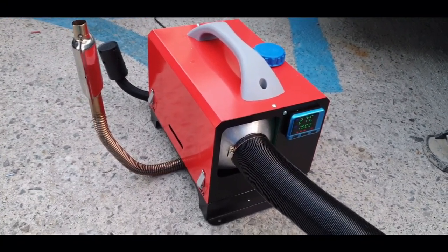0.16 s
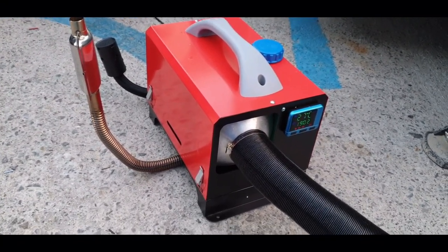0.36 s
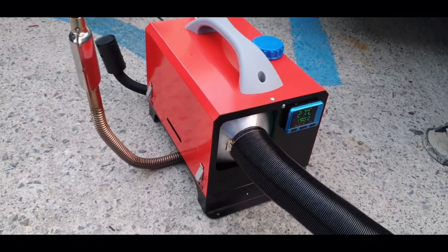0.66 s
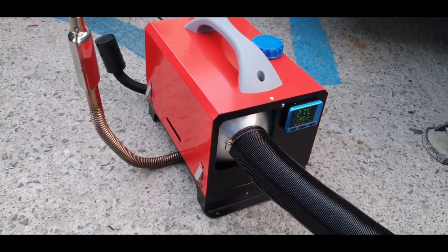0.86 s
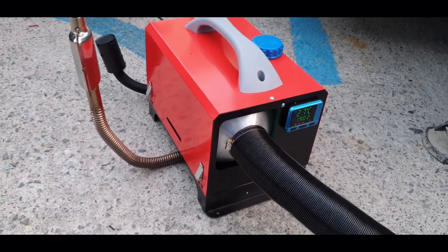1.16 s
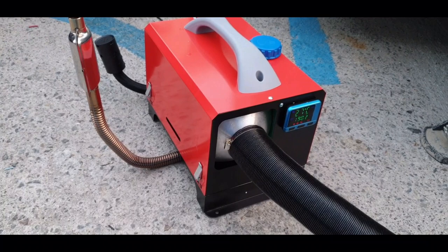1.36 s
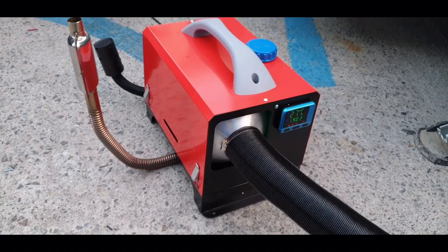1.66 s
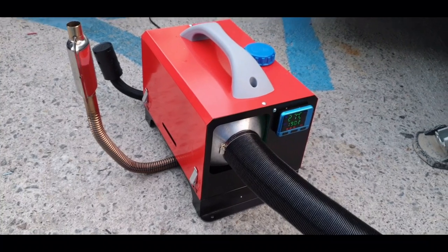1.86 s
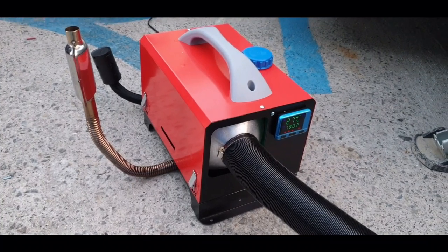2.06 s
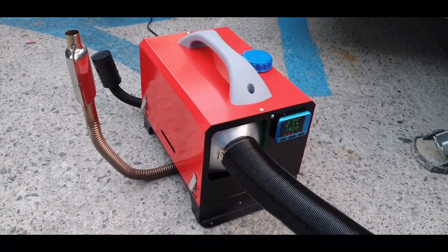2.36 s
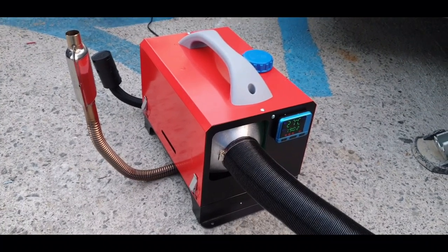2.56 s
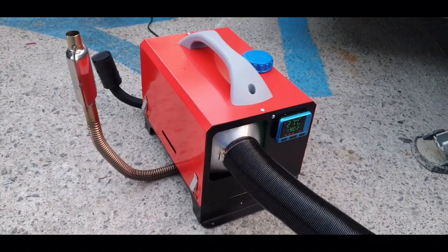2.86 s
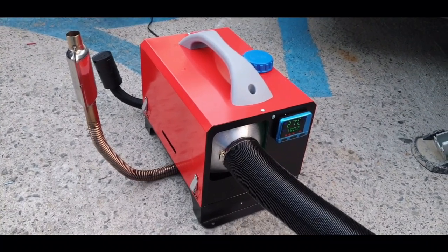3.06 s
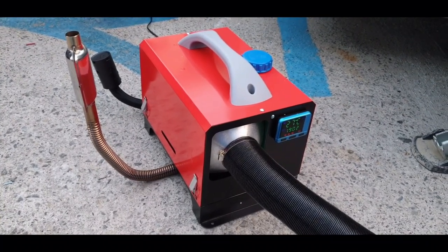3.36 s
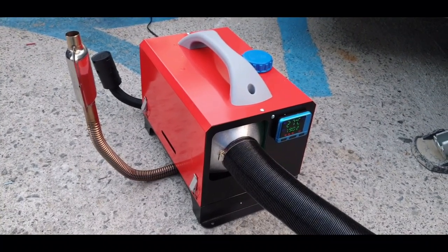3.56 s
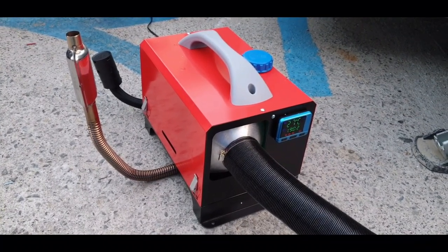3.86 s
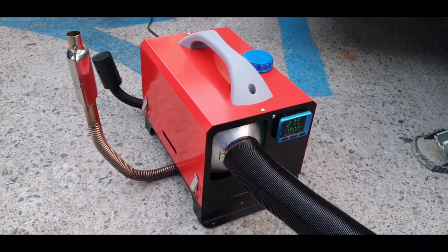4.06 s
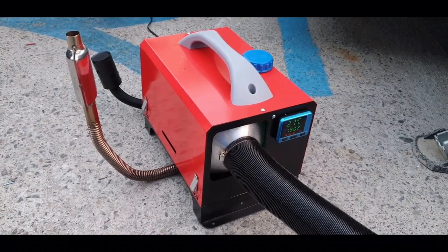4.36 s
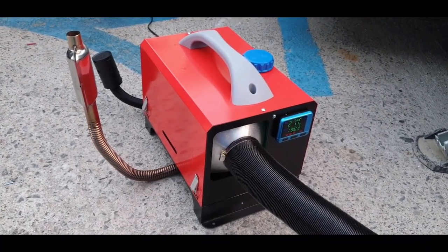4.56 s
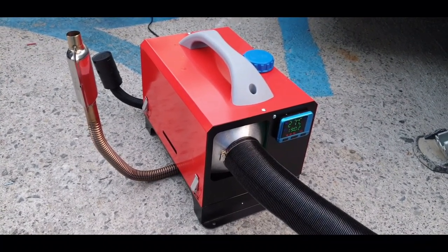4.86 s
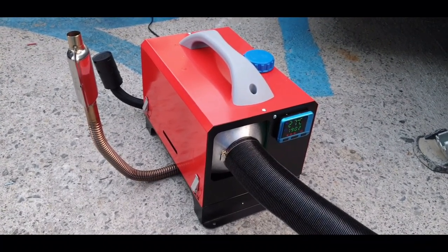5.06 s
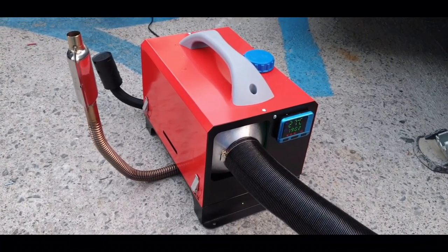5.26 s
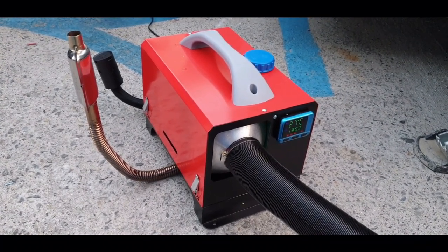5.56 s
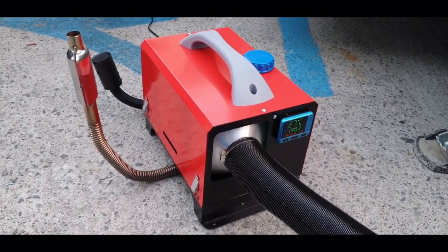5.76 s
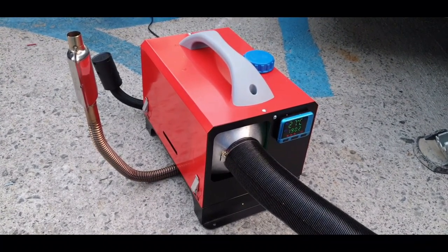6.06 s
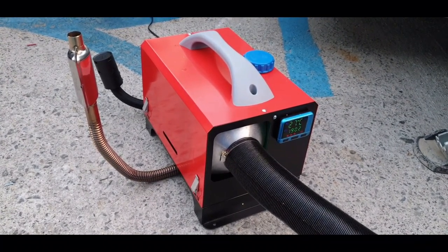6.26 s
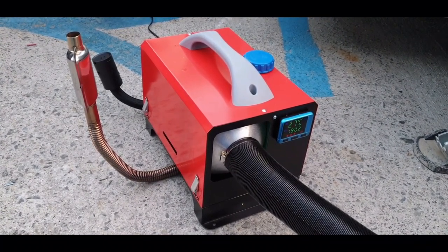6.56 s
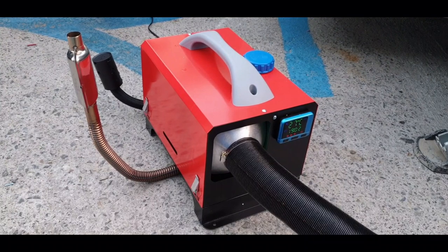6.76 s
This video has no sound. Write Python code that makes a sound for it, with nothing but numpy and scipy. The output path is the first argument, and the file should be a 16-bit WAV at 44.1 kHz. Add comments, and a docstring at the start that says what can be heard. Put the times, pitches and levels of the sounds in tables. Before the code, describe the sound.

A small fuel-burning heater drones low and unsteady outdoors with a faint blower whine, while cloth rustles and wind thumps the microphone.

```python
"""Diesel heater outdoors

A small diesel heater runs on concrete, close to a hand-held stereo microphone with left and right ports.
The flame drones as a wandering sine, flow noise rings the exhaust pipe, the blower whines in sines and
its brushes tick on every bar, loudest once a turn. Cloth rustles and snaps: shaped noise, strokes to the
right. Wind roars and buffets one port at a time, over a surging hiss and a bed of air and far traffic."""
import sys
import numpy as np
from scipy import signal
from scipy.io import wavfile
from scipy.ndimage import uniform_filter1d

SR = 44100
rng = np.random.default_rng(int(sys.argv[2]) if len(sys.argv) > 2 else 0)


def dump_mix(stems):
    """Bounce the given channels to the path in sys.argv[1] as a 16-bit WAV at rate SR."""
    frames = np.atleast_2d(stems).T  # one column per channel
    limited = np.clip(frames, -1, 1)  # hard clip at full scale
    pcm = np.round(limited * 32767).astype(np.int16)
    wavfile.write(sys.argv[1], SR, pcm)


N = 305157  # samples


def gain_of(db):
    """Decibels to gain."""
    return 10 ** (np.asarray(db) / 20)


def evened(x):
    """Scales to rms 1."""
    return x / np.sqrt(np.mean(x ** 2) + 1e-20)


def read(points, hz):
    """Interpolates a spectrum on a log-frequency axis."""
    f, value = np.transpose(points)
    return np.interp(np.log(hz + 1), np.log(f + 1), value)


def curves(rows):
    """Interpolates each column over time, one array of N samples per column."""
    s, *columns = np.transpose(rows)
    return [np.interp(np.arange(N) / SR, s, c) for c in columns]


def ports(left_minus_right_db):
    """Left and right gains for a level difference, total power kept."""
    left = gain_of(left_minus_right_db)
    return np.sqrt(2) * np.array([left, np.ones_like(left)]) / np.sqrt(1 + left ** 2)


def add(mix, s, sound):
    """Mixes a stereo sound in at s seconds."""
    part = mix[:, round(s * SR):][:, :sound.shape[1]]
    part += sound[:, :part.shape[1]]


def chance(size):
    """Smooth random wander of rms 1, changing over about size samples."""
    once = uniform_filter1d(rng.standard_normal(N), size=size)
    return evened(uniform_filter1d(once, size=size))


def swells(rows):
    """Power of swells that rise and fade evenly in dB; a negative fade time mirrors the swell in time."""
    t = np.arange(N) / SR
    rise_share = .65  # rise time / fade time
    power = 0
    for s, db, fade_s in rows:
        fade, rise = (t - s) / fade_s, (s - t) / (rise_share * fade_s)
        power = power + gain_of(2 * (db - 10 * np.maximum(fade, rise)))
    return power


def resonate(x, hz, width_hz):
    """Shifts the curve hz down to zero, smooths with two equal poles, shifts back; complex output."""
    turn = np.exp(2j * np.pi * np.cumsum(hz * np.ones(len(x))) / SR)
    r = np.exp(-np.pi * width_hz / SR)
    return turn * signal.lfilter([(1 - r) ** 2], [1, -2 * r, r * r], x / turn)


def noise(spectrum, balance, same, size, patchy_db, flicker_db):
    """Random short-time spectra with drifting patches and a flicker shared by all bands; rms 1."""
    frames, hz = 4 * N // size + 5, np.fft.rfftfreq(size, 1 / SR)
    a, b, c, d, patches = rng.standard_normal((frames, len(hz), 5)).T
    patches = uniform_filter1d(patches, size=8, axis=0)  # over bins
    patches = evened(uniform_filter1d(patches, size=12, axis=1))  # over frames
    flicker = rng.standard_normal(frames)
    same = np.clip(same(hz), 0, 1)[:, None]  # left-right likeness
    left, other = a + 1j * b, c + 1j * d
    lag = np.exp(-1j * 0.118)  # the shared part reaches the right port 0.118 rad late
    z = np.array([left, same * lag * left + np.sqrt(1 - same ** 2) * other])
    level_db = read(spectrum, hz)[:, None] + patchy_db * patches + flicker_db * flicker
    z *= ports(read(balance, hz))[:, :, None] * gain_of(level_db)
    return evened(signal.istft(z, nperseg=size, noverlap=3 * size // 4)[1][:, :N])


def drone():
    """The flame pulses unsteadily in a low, wandering note."""
    # mean course: (time [s], pitch [Hz], level [dB])
    flame_rows = [(0.0, 69.23, -43.5), (0.27, 78.45, -36.5), (0.71, 72.1, -35.5), (0.85, 74.45, -39),
                  (1.56, 73.5, -31), (1.69, 78.13, -42), (1.77, 72.2, -44), (1.97, 74.64, -30),
                  (2.21, 74.56, -26.5), (2.25, 74.38, -43), (2.33, 73.8, -31), (2.62, 77.92, -36.5),
                  (2.79, 74.4, -32), (3.04, 81.5, -36.5), (3.41, 78.5, -38.5), (3.93, 80.2, -30),
                  (4.35, 80.17, -32), (4.43, 79.35, -24), (4.55, 78.5, -40.5), (4.74, 78.77, -32),
                  (4.87, 76.08, -39), (5.36, 77.6, -32.5), (5.45, 81.74, -32.5), (5.69, 81.42, -32),
                  (5.78, 77.2, -28.5), (6.01, 77.9, -40), (6.03, 77.43, -34), (6.61, 75.7, -42.5),
                  (6.84, 77.6, -31), (6.92, 74.36, -33)]
    wander_hz, flutter_db = 2.9936, 2  # rms
    hz, db = curves(flame_rows)
    angle = 2 * np.pi * np.cumsum(hz + wander_hz * chance(size=1500)) / SR
    level = gain_of(db + flutter_db * chance(size=2000))
    return np.sqrt(2) * level * ports(-2.2)[:, None] * np.sin([angle + 0.54, angle])


def pipe():
    """Turbulent flow rings the pipe resonances, each swelling and sinking on its own."""
    # hot gas raises the resonances: (time [s], factor on pitch, flow level [dB])
    warmth_rows = [(0, 0.978, -52.5), (1.5, 0.987, -51), (3, 0.999, -51), (4.5, 1.005, -52),
                   (6, 1.018, -52), (6.92, 1.02, -54.5)]
    # resonances before warming:
    # (pitch [Hz], pole width [Hz], relative level [dB], left minus right [dB], left lead [rad])
    pipe_modes = [(54, 16.4, 12, -3, 0.07), (249.1, 43, -0.5, -2, 0.29), (283.7, 31.2, -1.5, -6.5, 0.15),
                  (452.5, 86.9, -3, 1, 0.77), (708.3, 34.4, -4.5, 2.5, 0.91), (748.3, 55, -11.5, 6, 0.753),
                  (925, 43, -18, -1, 3.06), (980, 146, -7, 3, 1.75), (1107.8, 28.3, -5, 4, 0.366),
                  (1131.5, 37, -3, -2, 0.52), (1184.1, 50, -7.5, 1, 1.62), (1025, 105, -10.5, -4, 3.06),
                  (1859.2, 160, -17, 6.5, 1.36)]
    swell_db = 2.0  # rms
    factor, flow_db = curves(warmth_rows)
    flow, out = rng.standard_normal(N), np.zeros((2, N))
    for hz, width_hz, mode_db, pan_db, lead_rad in pipe_modes:
        ring = resonate(flow, hz * factor, width_hz) * gain_of(swell_db * chance(size=1200))
        ring = ring / np.sqrt(np.mean(ring.real ** 2))
        both = np.array([(ring * np.exp(1j * lead_rad)).real, ring.real])
        out += gain_of(mode_db) * ports(pan_db)[:, None] * both
    return gain_of(flow_db) * out


def blower():
    """A blade tone with side tones one turn apart, and brush ticks on unevenly cut commutator bars."""
    # whine: (time [s], blade tone [Hz], level [dB])
    whine_rows = [(0, 672.7, -55), (1.6, 672.2, -55), (3.2, 674.9, -55), (4.25, 681.5, -56.5),
                  (5.45, 688.4, -60), (6.92, 700, -62)]
    # brush ticks: (time [s], level [dB])
    brush_rows = [(0, -65.5), (1.5, -69.5), (3, -68), (4.2, -66), (5, -61.5), (6.92, -79)]
    # motor housing rung by the brushes: (pitch [Hz], pole width [Hz], relative level [dB])
    housing_modes = [(9250, 250, -9), (9700, 200, -8), (11020, 160, -4), (11240, 150, -6), (11520, 300, 0),
                     (11820, 200, -4)]
    blades, brush_bars = 21, 10
    hz, tone_db = curves(whine_rows)
    ticks_db, = curves(brush_rows)
    turns = np.cumsum(hz) / SR / blades

    lead_rad = np.array([[.6], [0]])
    tone = 0
    for k, side_db in ((0, 0), (-1, -15), (1, -15)):
        tone = tone + gain_of(side_db) * np.sin(2 * np.pi * (blades + k) * turns + lead_rad)

    phase = turns + 0.49
    at = np.flatnonzero(np.diff(np.floor(phase * brush_bars)))
    bar = (phase[at + 1] * brush_bars).astype(int) % brush_bars
    # samples: a fixed offset per bar, plus jitter
    late = rng.integers(0, 60, brush_bars)[bar] + rng.integers(0, 2, len(at))
    tick_db = 11 * np.cos(2 * np.pi * phase[at]) + 2.5 * rng.standard_normal(len(at))  # peaks once a turn
    ticks = np.zeros(N + 100)
    ticks[at + late] = gain_of(tick_db)
    ring = evened(sum(gain_of(d) * evened(resonate(ticks[:N], f, w).real) for f, w, d in housing_modes))
    both = np.array([np.roll(ring, 17), ring])  # left 17 samples late
    ring = gain_of(ticks_db) * ports(-8)[:, None] * both
    return np.sqrt(2) * gain_of(tone_db) * ports(2.3)[:, None] * tone + ring


def snap_of(hz):
    """A fibre snaps: a decaying sine and a longer burst of noise, thinned below; peak 1."""
    t = np.arange(300) / SR
    crack = np.exp(-t / .00016) * np.sin(2 * np.pi * hz * t)
    fray = np.exp(-t / .0015) * resonate(rng.standard_normal(len(t)), hz, 9000).real
    thin = signal.butter(2, .55 * hz, "high", fs=SR, output="sos")
    snap = signal.sosfilt(thin, crack + .6 * fray)
    return snap / abs(snap).max()


def rustle():
    """Cloth fibres slip in dense grains; now and then one snaps."""
    # cloth spectrum: (frequency [Hz], relative level per Hz [dB])
    cloth_points = [(1470, -63), (2500, -4.5), (3580, -4.5), (5890, 3), (8070, 0.5), (9140, 4.5),
                    (10100, 1.5), (11600, 4), (14400, -0.5)]
    # (frequency [Hz], left minus right [dB])
    cloth_balance = [(2000, -1), (6000, 2.5), (8000, -4.5), (12000, -4.5), (13500, -17), (14700, -30)]
    # constant shifting: (time [s], level [dB])
    shifting_rows = [(0, -63.5), (.75, -67.5), (1.3, -66), (2, -67.5), (2.7, -68), (3.2, -64), (3.9, -64.5),
                     (4.3, -55), (4.9, -59), (5.15, -64), (5.7, -63), (6.2, -62.5), (6.92, -60.5)]
    # strokes: (peak time [s], level [dB], time to fade 10 dB [s])
    stroke_rows = [(.2, -64, .05), (.35, -65, .06), (.56, -64, .06), (1.015, -62, .045),
                   (1.085, -59.5, .035), (1.33, -66, .03), (1.945, -58, .06), (2.08, -66, .1),
                   (2.19, -53, .05), (2.87, -59.5, .07), (2.92, -56.5, .09), (3.2, -54.5, .06),
                   (3.36, -54.5, .05), (3.42, -55, .06), (3.53, -52, .04), (3.6, -45, .05), (3.69, -53, .1),
                   (3.79, -51.5, .035), (3.99, -54, .06), (4.07, -47.5, .06), (4.16, -46.5, .07),
                   (4.37, -50.5, .05), (4.47, -43, .05), (4.57, -49, .05), (4.645, -45, .05),
                   (4.72, -45.5, .035), (4.82, -51, .05), (4.98, -53, .15), (5.06, -54, .04),
                   (5.22, -54, .05), (5.41, -55.5, .03), (5.49, -56, .08), (5.59, -55.5, .06),
                   (5.78, -56, .06), (5.97, -55, .06), (6.049, -52, .012), (6.21, -56, .06),
                   (6.32, -57, .1), (6.44, -55.5, .06), (6.58, -54.5, .1), (6.72, -57, .1),
                   (6.84, -58, .08)]
    # single snaps: (time [s], left peak [dB], right peak [dB], centre [Hz])
    snap_rows = [(0.0799, -44, -40, 7200.0), (1.326, -43, -49, 8000.0), (1.3369, -43, -51, 7300.0),
                 (1.7852, -54, -40, 10000.0), (2.6637, -58, -48, 9200.0), (2.9075, -49, -33, 10700.0),
                 (3.3105, -51, -38, 9600.0), (3.3679, -51, -34, 8900.0), (3.7449, -39, -43, 5600.0),
                 (3.7815, -46, -32, 10200.0), (3.9617, -34, -37, 5900.0), (3.9716, -41, -41, 6200.0),
                 (4.3769, -45, -32, 10900.0), (4.6538, -30, -34, 6900.0), (4.6587, -33, -30, 6200.0),
                 (4.7127, -40, -24, 10800.0), (5.2904, -51, -37, 7800.0), (5.3539, -51, -34, 10000.0),
                 (5.4108, -38, -45, 5500.0), (5.7995, -49, -40, 11400.0), (5.94, -53, -37, 9500.0),
                 (6.0485, -50, -34, 11000.0), (6.1954, -48, -30, 8200.0)]
    shifting_pan_db, stroke_pan_db = 6.5, -7  # left minus right
    shifting = gain_of(curves(shifting_rows)) * ports(shifting_pan_db)[:, None]
    power = shifting ** 2 + swells(stroke_rows) * ports(stroke_pan_db)[:, None] ** 2
    fibres = noise(cloth_points, cloth_balance, lambda hz: 0.052 + 0 * hz,
                   size=256, patchy_db=2.0, flicker_db=1.5)
    out = np.sqrt(power) * fibres / fibres.mean(0).std()  # levels refer to the mean of both ports
    slips = rng.random((2, N)) < 150 / SR  # 150 per second at each port
    grains = gain_of(1.21 * np.minimum(rng.exponential(1, (2, N)), 4)) * slips
    out *= 1 + .5 * uniform_filter1d(grains, size=24, axis=1) * 24  # 24-sample slips stand out
    for s, left_db, right_db, hz in snap_rows:
        add(out, s, gain_of([[left_db], [right_db]]) * snap_of(hz))
    return out


def wind():
    """Lumpy low noise, unrelated at the ports; single eddies strike one port, pitch falling as they slow."""
    # gusts over the ports: (time [s], left level [dB], right level [dB])
    gust_rows = [(0, -37.5, -35), (.65, -35, -47), (1, -62.5, -61), (1.45, -64, -34.5), (2.5, -47, -64),
                 (3.4, -63.5, -74), (4.3, -42, -37), (4.55, -44, -41.5), (4.7, -33, -25), (4.82, -46, -33),
                 (5, -35, -30), (5.15, -52, -48), (5.7, -33.5, -26.5), (5.92, -44.5, -60),
                 (6.12, -55, -23.5), (6.3, -35.5, -34), (6.5, -34, -58), (6.7, -42.5, -56),
                 (6.85, -31, -47)]
    # gust spectrum: (frequency [Hz], relative level per Hz [dB])
    gust_points = [(25, -5.5), (50, 2), (85, 3), (130, -7), (250, -23.5), (500, -45), (1000, -92)]
    # buffets: (time [s], starting level before attack and panning [dB], starting pitch [Hz],
    # settled pitch [Hz], time to fade 60 dB [s], left minus right [dB])
    buffet_rows = [(4.714, -16.5, 100.2, 71.93, 0.25, -10.5), (4.803, -15.5, 191, 111.1, 0.066, -23.5),
                   (4.852, -14.5, 100.6, 75, 0.0595, -13), (5.0172, -6, 111, 78, 0.0646, -11.5),
                   (5.617, -17.5, 191.2, 100.2, 0.0842, 21.5), (5.637, -24.5, 332.2, 199, 0.1, 16),
                   (5.654, -17.5, 121.3, 91.8, .12, -24.5), (5.696, -19, 99, 75, 0.128, 20),
                   (5.738, -29, 230, 174, 0.12, -27), (5.835, -23.5, 168, 96.3, 0.16, 33.5),
                   (5.887, -32, 220.3, 169.2, 0.052, 44), (6.0825, -14, 436.5, 251, 0.057, -39.5),
                   (6.091, -3, 151, 95, 0.0424, -33), (6.109, -11, 184.5, 109, 0.055, -42),
                   (6.139, -20, 132, 82.6, 0.38, -27.5), (6.245, -22.5, 240, 130, 0.158, -37),
                   (6.565, -25.5, 238.7, 189.9, 0.082, 29), (6.745, -3, 84.44, 68.06, 0.0591, 15),
                   (6.803, -12, 168.1, 64.8, 0.18, 32.5)]
    roar = noise(gust_points, [(1, 0), (2, 0.006)], lambda hz: 0 * hz,
                 size=2048, patchy_db=1.5, flicker_db=-2.0)
    out, t = gain_of(curves(gust_rows)) * roar, np.arange(SR // 2) / SR
    for s, start_db, start_hz, end_hz, t60_s, pan_db in buffet_rows:
        hz = end_hz + (start_hz - end_hz) * np.exp(-t / 0.0063)
        lumps = evened(resonate(rng.standard_normal(len(t)), 2 * hz, 132).real)
        thud = 0.081 * lumps - np.sin(2 * np.pi * np.cumsum(hz) / SR)  # suction first, then the push
        attack = 1 - np.exp(-t * start_hz * 1.87)
        shape = attack * gain_of(start_db - 60 * t / t60_s)
        add(out, s, ports(pan_db)[:, None] * shape * thud)
    return out


def hiss():
    """Steady noise, duller than the cloth, with surges added in power."""
    # spectrum: (frequency [Hz], relative level per Hz [dB])
    hiss_points = [(1000, 3), (1500, 5), (2400, 7), (3200, -1.5), (4200, -4), (6000, -19.5)]
    # surges: (peak time [s], level [dB], time to fade 10 dB [s], negative = mirrored in time)
    surge_rows = [(.05, -59, 0.8), (.88, -83.5, -0.82), (1.95, -59, 0.17), (2.41, -55, 0.15),
                  (3.6, -61, -0.1), (3.73, -61, 0.14), (4.07, -59, 0.35), (4.17, -62.5, 0.5),
                  (4.5, -58.5, .25), (4.97, -48, 0.0064), (6.44, -63, -1.7), (6.63, -57, .03)]
    steady_db = -65
    bed = noise(hiss_points, [(1500, 0.5), (4000, -0.92)], lambda hz: 0.044 + 0 * hz,
                size=512, patchy_db=0.5, flicker_db=1.5)
    return np.sqrt(gain_of(2 * steady_db) + swells(surge_rows)) * bed


def air():
    """Moving air and far traffic: noise that the two ports share mostly in the bass."""
    # spectrum: (frequency [Hz], relative level per Hz [dB])
    air_points = [(13, -37), (22, -4.5), (76, 2), (181, -14), (271, -19), (385, -24), (466, -25),
                  (563, -27.5), (680, -29), (844, -35.5), (1110, -31), (1490, -36), (3630, -53),
                  (11600, -54), (14000, -93.5)]
    # (frequency [Hz], left minus right [dB])
    air_balance = [(30, -1.5), (200, -2), (500, -2.5), (4000, -4), (8000, -21.5), (13000, 0), (13600, -20)]
    # (frequency [Hz], left-right likeness [0..1])
    air_likeness = [(25, 0.54), (60, 0.961), (280, 0.908), (400, 0.267), (600, 0.1), (1500, 0.066),
                    (4000, 0.033)]
    level_db = -35
    return gain_of(level_db) * noise(air_points, air_balance, lambda hz: read(air_likeness, hz),
                                     size=4096, patchy_db=0.5, flicker_db=2.0)


def scene():
    """All sources at the two ports."""
    return drone() + pipe() + blower() + rustle() + wind() + hiss() + air()


def record(dry):
    """The lowest bass is thinned out; then the band limit."""
    edge_hz = 14560
    thin = signal.sosfilt(signal.butter(2, 36.0, "high", fs=SR, output="sos"), dry)
    band = signal.firwin(1023, edge_hz, window=("kaiser", 9), fs=SR)
    return signal.oaconvolve(thin, band[None], "same")


dry = scene()
out = record(dry)
dump_mix(out)
```